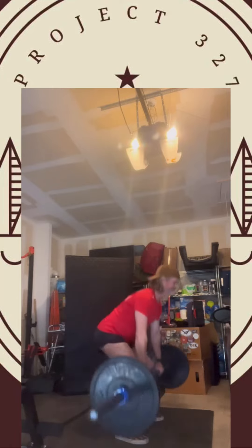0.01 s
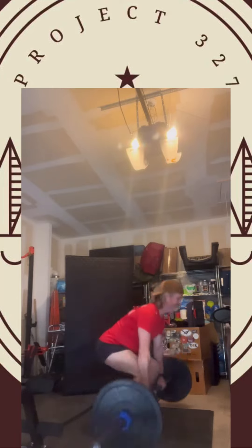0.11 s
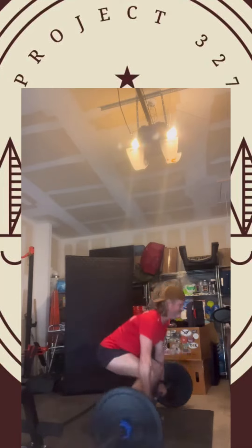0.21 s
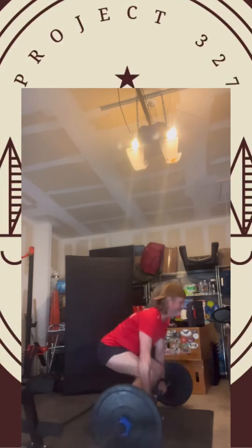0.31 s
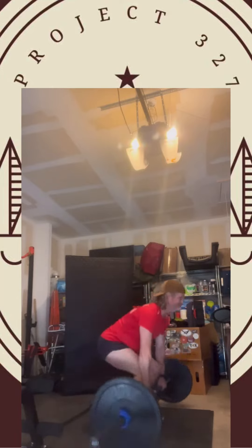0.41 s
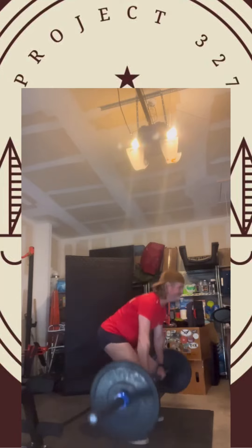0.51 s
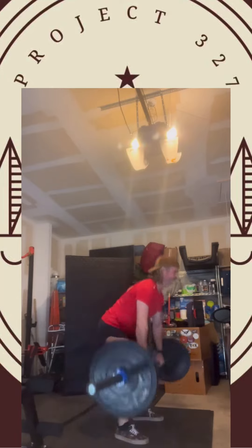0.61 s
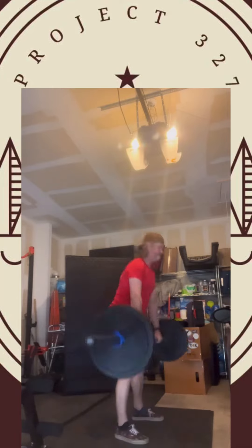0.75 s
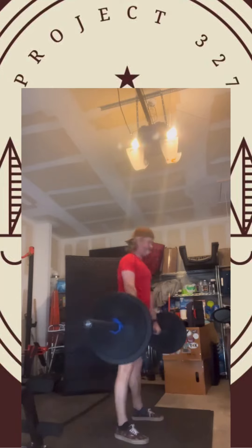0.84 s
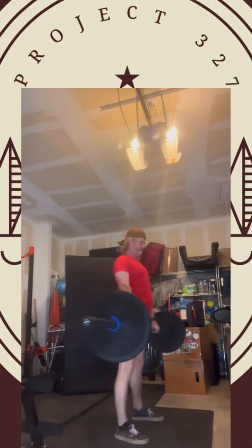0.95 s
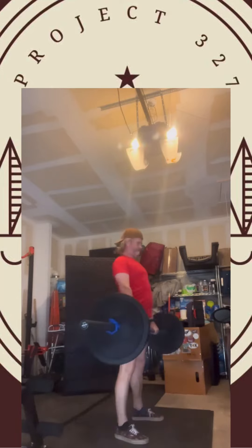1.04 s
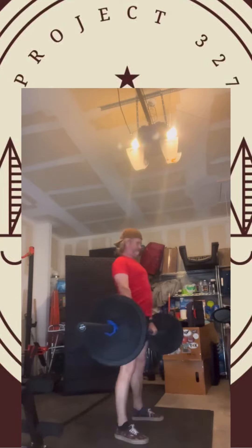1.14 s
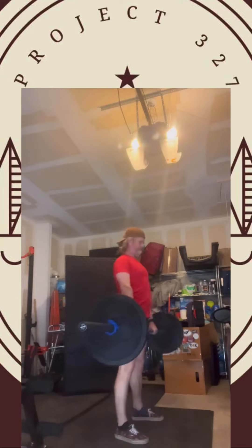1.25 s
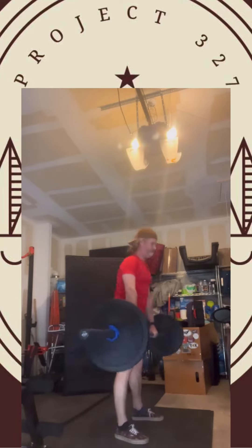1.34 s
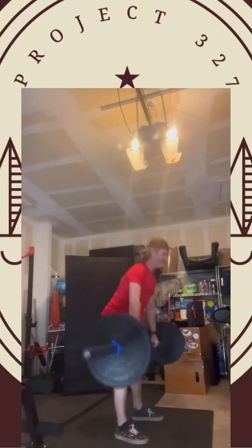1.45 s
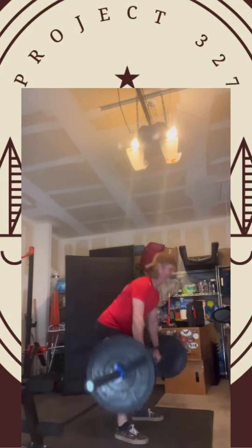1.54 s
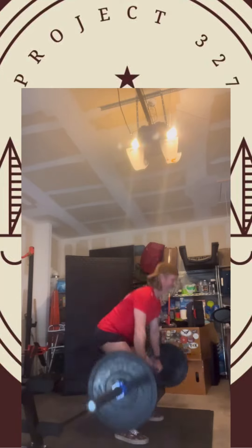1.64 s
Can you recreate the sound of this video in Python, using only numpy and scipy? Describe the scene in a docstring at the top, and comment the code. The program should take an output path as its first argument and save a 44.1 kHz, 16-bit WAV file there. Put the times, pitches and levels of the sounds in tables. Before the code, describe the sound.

A loaded barbell lands at 0.2 s: a faint touch, hard bright crack, clustered low thuds and a bounce at 0.25 s. Iron rings briefly in the garage while loose plates chatter until 0.45 s. A softer knock at 0.52 s brings light clinks until 0.72 s. Brushing hiss swells around 0.6-0.8 s and 1.45-1.6 s. Low uneven rumble and a very faint pulsing high whine continue throughout.

```python
"""A low rumble fills a garage and a faint high whine pulses: coloured and narrow-band noise, both throughout.
One end of a loaded barbell touches, the blow and a bounce follow: irregular contacts ring the iron and the room,
a noise burst gives the crack, landings thud in the floor modes and loose plates chatter.
The load settles with a softer knock and clinks as it is lifted: contacts on load and sleeve modes.
The bar brushes the legs going up and down: swelling hiss. Two close microphone ports hear it all."""
import sys
import numpy as np
from scipy import signal
from scipy.fft import rfft, irfft, next_fast_len
from scipy.io import wavfile

SR = 44100
rng = np.random.default_rng(int(sys.argv[2]) if len(sys.argv) > 2 else 0)


def inscribe(sig):
    """Save sig as 16-bit PCM at rate SR to the path in sys.argv[1].

    A 1-D sig is mono; a 2-D sig holds one channel per row.
    Samples are clipped to [-1, 1] before scaling.
    """
    pcm = np.round(np.clip(np.atleast_2d(sig).T, -1, 1) * 32767)
    wavfile.write(sys.argv[1], SR, pcm.astype(np.int16))


N = 74970


def amp(db):
    """Amplitude factor of a level in dB."""
    return 10 ** (np.asarray(db) / 20)


def rms_one(x):
    """Scale to rms 1 over all channels."""
    return x / np.sqrt(np.mean(x ** 2) + 1e-20)


def at_hz(points, hz):
    """Interpolate a table over log frequency."""
    table_hz, values = np.transpose(points)
    return np.interp(np.log(np.maximum(hz, 1)), np.log(table_hz), values)


def in_time(rows):
    """Interpolate a table over time, per sample."""
    table_s, values = np.transpose(rows)
    return np.interp(np.arange(N) / SR, table_s, values)


def lowpass(order, hz):
    """Butterworth low-pass sections."""
    return signal.butter(order, hz, fs=SR, output="sos")


def coloured(spectrum, size=N):
    """Two unrelated noises shaped to a spectrum above 20 Hz, rms 1."""
    hz = np.fft.rfftfreq(size, 1 / SR)
    white = rfft(rng.standard_normal((2, size)))
    return rms_one(irfft(white * amp(at_hz(spectrum, hz)) * (hz > 20), size))


def drift(knots_per_s):
    """Slow random level: normal knots of spread 1, joined by lines."""
    knots = rng.standard_normal(200)
    return np.interp(np.arange(N) / SR * knots_per_s, np.arange(200), knots)


# rumble spectrum: f/Hz, relative density/dB
RUMBLE_SPECTRUM = [(30, -15), (45, -6), (65, 5), (100, 0.5), (170, -9), (300, -13), (550, -8), (900, -16.5),
                   (1400, -25.5), (2000, -34), (3000, -47.5), (5000, -49.5), (9000, -57), (16000, -63.5)]
# swell of the rumble bass: t/s, relative level/dB
BASS_SWELL = [(0, 7), (.074, -3.5), (.146, 2.5), (.18, -2), (.5, -1.5), (.596, 3.5), (.65, -1), (.77, -1),
              (.866, 2.5), (.93, 3.5), (1.0, 1.5), (1.1, -0.5), (1.168, -5.5), (1.278, 2), (1.42, -2.5),
              (1.46, 2), (1.58, -2.5), (1.62, 2), (1.7, 1)]
# swell of the upper rumble: t/s, relative level/dB
UPPER_SWELL = [(0, 3), (.15, -1.5), (.5, 4), (.75, 0), (1.0, 0), (1.2, 0.5), (1.45, 0.5), (1.7, -0.5)]
RUMBLE_DB, BASS_BELOW_HZ = -48.5, 100
BASS_LUMPS_DB, UPPER_LUMPS_DB = 3, 1  # spread of the random level


def rumble():
    """Low noise whose level comes in lumps, most of all in the bass."""
    noise = coloured(RUMBLE_SPECTRUM)
    bass = signal.sosfiltfilt(lowpass(2, BASS_BELOW_HZ), noise)
    bass_db = in_time(BASS_SWELL) + BASS_LUMPS_DB * drift(25.0)
    upper_db = in_time(UPPER_SWELL) + UPPER_LUMPS_DB * drift(13.0)
    return amp(RUMBLE_DB) * (amp(bass_db) * bass + amp(upper_db) * (noise - bass))


WHINE_HZ, WHINE_HALF_WIDTH_HZ, WHINE_DB = 14200, 330, -85.5
PULSES_PER_S, PULSE_PEAK_S, PULSE_SHARPNESS = 30, 0.026, 0.72


def whine():
    """Narrow high noise band under a steady periodic pulse."""
    edges_hz = [WHINE_HZ - WHINE_HALF_WIDTH_HZ, WHINE_HZ + WHINE_HALF_WIDTH_HZ]
    band = signal.butter(2, edges_hz, "band", fs=SR, output="sos")
    hiss = signal.sosfilt(band, rng.standard_normal((2, N)))
    phase = 2 * np.pi * PULSES_PER_S * (np.arange(N) / SR - PULSE_PEAK_S)
    pulse = np.exp(PULSE_SHARPNESS * np.cos(phase))
    return amp(WHINE_DB) * rms_one(pulse * hiss)


# bar on cloth: f/Hz, relative density/dB
BRUSH_SPECTRUM = [(1500, -8), (2100, 1.3), (3000, -19), (4000, -11), (5200, -11.5), (7000, -12.5),
                  (8000, -17), (9000, -17.5), (10200, -28.5), (11500, -24.5), (13000, -18.5),
                  (14300, -13.5), (15500, -20), (16200, -44)]
# brushing: t/s, level/dB
BRUSH_LEVEL = [(0, -94), (.45, -80.5), (.6, -60.5), (.8, -59.5), (.9, -68.5), (1.02, -63.5), (1.09, -67),
               (1.13, -77), (1.2, -75.5), (1.3, -69), (1.45, -60.5), (1.6, -62), (1.7, -68.5)]
# treble of the brushing against the rest: t/s, relative level/dB
BRUSH_TREBLE = [(0, -2.5), (1.1, 5), (1.3, -2.5), (1.7, -11)]
BRUSH_TREBLE_ABOVE_HZ = 11000


def brushing():
    """Smooth friction hiss of the bar along the legs, with a moving treble share."""
    hiss = coloured(BRUSH_SPECTRUM)
    low = signal.sosfiltfilt(lowpass(4, BRUSH_TREBLE_ABOVE_HZ), hiss)
    treble = amp(in_time(BRUSH_TREBLE)) * (hiss - low)
    return amp(in_time(BRUSH_LEVEL)) * (low + treble)


# the blow as heard through room and microphone: f/Hz, relative density/dB
BLOW_COLOUR = [(35, -30.5), (60, -13.5), (120, -8), (190, -4.5), (300, -6), (500, -3), (1000, -1.36),
               (1500, -7.0), (2400, -6.5), (3400, -4.5), (4200, -5), (5200, -3.5), (6200, -6),
               (7300, -11.0), (8200, -13.0), (9600, -9.5), (10500, -20), (11200, -52.5), (12300, -25.5),
               (13400, -6), (15200, -9.5), (16200, -61)]
# decay of the garage: f/Hz, t60/s
GARAGE_T60 = [(80, 0.26), (300, .35), (800, 0.54), (1800, 0.7), (4000, 0.63), (9000, 0.53), (14000, .35)]
GARAGE_RISE_S = 0.0024


def garage(x):
    """Two diffuse room responses: coloured noise that dies band by band, convolved with x."""
    t, hz = np.arange(SR) / SR, np.fft.rfftfreq(SR, 1 / SR)
    noise = rfft(coloured(BLOW_COLOUR, SR))
    centres_hz = np.geomspace(60, 16000, num=14)
    response = 0
    for k, centre_hz in enumerate(centres_hz):
        # overlapping triangular bands in log frequency
        share = np.interp(np.log(hz + 1), np.log(centres_hz), np.arange(14) == k)
        t60_s = at_hz(GARAGE_T60, centre_hz)
        response = response + irfft(noise * share, SR) * amp(-60 * t / t60_s)
    response = response * np.clip(t / GARAGE_RISE_S, 0, 1)
    response = response * np.sqrt(SR / 20) / np.sqrt(np.sum(response ** 2) / 2)
    return signal.fftconvolve(x[None], response, axes=1)[:, :N]


CONTACTS_PER_S, CONTACT_SPREAD_DB = 900, 4
RATTLE_FADE_DB = 6.5  # after one rattle length; grows with time squared


def rattle(start_s, level_db, first_db, length_s, dull_hz):
    """A first contact, then random uneven ones that fade, low-passed at dull_hz."""
    t = np.arange(N) / SR - start_s
    fade = (t > 0) * amp(-RATTLE_FADE_DB * (t / length_s) ** 2)
    sizes = amp(CONTACT_SPREAD_DB * np.minimum(rng.exponential(1, N), 3))
    sizes = sizes * rng.choice([-1, 1], N)
    hits = sizes * (rng.random(N) < CONTACTS_PER_S / SR) * fade
    hits[int(start_s * SR)] = amp(first_db + CONTACT_SPREAD_DB)
    hits = amp(level_db) * hits / np.sqrt(np.sum(hits ** 2))
    return signal.sosfilt(lowpass(4, min(dull_hz, SR / 2.1)), hits + 1e-18)


def ringing(contacts, modes):
    """Every contact excites each mode, a two-pole resonator with its own t60."""
    out = 0
    for hz, level_db, t60_s in modes:
        radius, w = amp(-60 / (t60_s * SR)), 2 * np.pi * hz / SR
        poles = [1, -2 * radius * np.cos(w), radius * radius]
        out = out + amp(level_db) * signal.lfilter([0, np.sin(w)], poles, contacts + 1e-18)
    return out


# light clinks as the load is taken up: t/s, relative level/dB
CLINKS = [(.53, -39), (.548, -39), (.575, -45.5), (.598, -48), (0.621, -51), (0.644, -45.5), (.686, -45.5),
          (.718, -57)]
# modes of collar and sleeve: f/Hz, relative level/dB, t60/s
SLEEVE_MODES = [(1730, -8, 0.016), (1770, 1, 0.052), (1898, 3, 0.057), (2010, -11, 0.036)]
CLINK_LENGTH_S = 0.0045


def clinks():
    """Very short rattles ring collar and sleeve."""
    contacts = sum(rattle(s, level_db, 3.3, CLINK_LENGTH_S, 6000) for s, level_db in CLINKS)
    return ringing(contacts, SLEEVE_MODES)


# loose plates on the sleeve after the blow: t/s, relative level/dB
CHATTER = [(.272, -24.5), (.30, -29.5), (0.331, -29), (0.363, -32.5), (0.404, -35), (0.447, -37)]
CHATTER_LENGTH_S = 0.021


def chatter(modes):
    """Short rattles of loose plates ring the given damped modes."""
    contacts = sum(rattle(s, level_db, 3.0, CHATTER_LENGTH_S, 9800) for s, level_db in CHATTER)
    return ringing(contacts, modes)


# plates meet the floor: t/s, relative level/dB
THUDS = [(.2035, -21), (0.2141, -23), (0.2264, -21.5), (0.2381, -25.5), (.253, -23.5), (.267, -27.5),
         (0.299, -33), (.332, -33)]
# modes of the floor under the blow: f/Hz, relative level/dB, t60/s
FLOOR_MODES = [(73.7, -13, 0.28), (122.05, -2.5, .12), (190, 0, .11), (430, -10, 0.12), (591.4, 5, .09),
               (746, 1, 0.14), (898, -6, 0.18), (1073, 0.5, .08), (1173, 5, 0.072)]
THUD_DB, THUD_SPREAD_DB, THUD_BELOW_HZ = -4.5, 2, 2480


def thuds():
    """Each landing strikes every floor mode with a random strength of its own."""
    s, level_db = np.transpose(THUDS)
    spread = rng.standard_normal((len(s), len(FLOOR_MODES)))
    out = 0
    for k, mode in enumerate(FLOOR_MODES):
        hits = np.zeros(N)
        hits[(s * SR).astype(int)] = amp(level_db + THUD_SPREAD_DB * spread[:, k])
        out = out + ringing(hits, [mode])
    return amp(THUD_DB) * signal.sosfilt(lowpass(2, THUD_BELOW_HZ), out)


# touch, blow, bounce, settling: t/s, relative level/dB, first contact/dB, rattle length/s, low-pass f/Hz
CLATTERS = [(0.184, -37.5, -4, .012, 5630), (0.2017, -14.5, 12.5, 0.037, 18000),
            (0.251, -25.5, 5.5, 0.03, 3200), (0.52, -43, 9, 0.066, 2480)]
# modes of the iron: f/Hz, relative level/dB, t60/s
IRON_MODES = [(2160, -3.5, 0.5), (2465, -2.5, 0.63), (2750, -5.5, 0.84), (3042, -4, .48),
              (3330, -5.5, 0.61), (3570, -5.5, .41), (3954, -6, .55), (4347, -6, 0.42), (4420, -8, 0.35),
              (4745, -9, 0.57), (4700, -5.5, .5), (5076, -8, 0.44), (5466, -7, .55), (5530, -5, .7),
              (5570, -8.5, .55), (6070, -4.5, 0.34), (6537, -7, 0.45), (7031, -7, 0.57), (8085, 0.5, 0.47),
              (9300, 0.5, .35), (10637, 2, .4), (13400, -1.5, 0.13), (15100, -3.5, .25)]
# modes of the settling load: f/Hz, relative level/dB, t60/s
LOAD_MODES = [(243, -8, 0.027), (269.6, 2.5, 0.12), (320, 0, 0.093), (370, -3.5, 0.05), (503, -3.5, 0.04),
              (790, -8, .04), (950, -5, 0.034)]
DAMPED_SHARE = .09  # share of its t60 that iron pressed on the floor keeps
ROOM_RING_DB, ROOM_LOAD_DB, ROOM_CLINK_DB = -31.5, -28.5, -35
NEAR_RING_DB, NEAR_LOAD_DB, NEAR_CHATTER_DB, NEAR_IRON_BELOW_HZ = -16.5, 5, 0.4, 7200


def barbell():
    """Contacts ring iron, load and sleeve; the room answers and part is heard directly."""
    touch, blow, bounce, settle = (rattle(*row) for row in CLATTERS)
    contacts = touch + blow + bounce
    load = ringing(settle, LOAD_MODES)
    sleeve = clinks()
    damped = [(hz, level_db, DAMPED_SHARE * t60_s) for hz, level_db, t60_s in IRON_MODES]
    to_room = contacts + amp(ROOM_RING_DB) * ringing(contacts, damped)
    to_room = to_room + amp(ROOM_LOAD_DB) * load + amp(ROOM_CLINK_DB) * sleeve
    iron = amp(NEAR_RING_DB) * ringing(contacts, IRON_MODES) + amp(NEAR_CHATTER_DB) * chatter(damped)
    iron = signal.sosfilt(lowpass(8, NEAR_IRON_BELOW_HZ), iron)
    near = thuds() + iron + amp(NEAR_LOAD_DB) * load + sleeve
    return garage(to_room) + near * [[1], [0]]  # direct sound in the first field only


CRACK_DB, CRACK_DECAY_S, CRACK_ABOVE_HZ = -21, 0.0024, 2100


def crack():
    """Short bright front of the blow: decaying noise, high-passed, unrelated left and right."""
    t = np.arange(N) / SR - CLATTERS[1][0]
    burst = rng.standard_normal((2, N)) * (t > 0) * np.exp(-np.abs(t) / CRACK_DECAY_S)
    highpass = signal.butter(2, CRACK_ABOVE_HZ, "high", fs=SR, output="sos")
    return amp(CRACK_DB) * signal.sosfilt(highpass, burst)


# phase by which left leads: f/Hz, phase/rad
PORT_LEAD = [(60, 0.5), (170, -0.1), (330, 0.5), (520, 3), (950, 3.5), (2400, 3.5), (2900, 3.5),
             (3350, 3.5), (4100, 4.5), (4500, 2.5), (5400, 1.2), (6200, 1.13), (7000, 1.5), (7900, 3),
             (10700, 2.5), (12600, 5.5), (14000, 6), (16400, 6)]
# likeness of the ports: f/Hz, share/0-1
PORT_LIKENESS = [(60, .998), (170, 0.96), (520, 0.67), (1500, .72), (2400, 0.92), (2900, 0.97),
                 (3250, 0.87), (3600, 0.7), (4200, 0.31), (5500, 0.79), (6500, 0.39), (7600, 0.95),
                 (8200, 0.92), (10800, 0.95), (11600, 1), (12700, 1), (16000, 1)]
# left over right: f/Hz, level/dB
PORT_TILT = [(60, 0.5), (110, 0.5), (200, 4.5), (380, 10.5), (700, 4), (1290, 3), (2380, 1), (2900, 0.5),
             (4400, 1), (8120, 0.5), (15000, -0.5)]
OPPOSED_HZ, OPPOSED_EDGE_HZ = (7600, 11500), 700  # band of opposed ports, width of its soft edges


def ports(pair):
    """Left hears the first field; right hears it phase-shifted, rescaled and mixed with the second."""
    size = next_fast_len(N + 4096)
    hz = np.fft.rfftfreq(size, 1 / SR)
    first, second = rfft(pair, size)
    alike = np.clip(at_hz(PORT_LIKENESS, hz), 0, 1)
    shifted = first * np.exp(-1j * at_hz(PORT_LEAD, hz))
    right = alike * shifted + np.sqrt(1 - alike ** 2) * second
    right = right * amp(-at_hz(PORT_TILT, hz))
    inside_hz = np.minimum(hz - OPPOSED_HZ[0], OPPOSED_HZ[1] - hz)
    opposed = np.sin(np.pi / 2 * np.clip(inside_hz / OPPOSED_EDGE_HZ, 0, 1)) ** 2
    right = (1 - opposed) * right - opposed * first
    return np.array([pair[0], irfft(right, size)[:N]])


def scene():
    """All sources through the two ports; the crack is added to each port directly."""
    return ports(rumble() + whine() + brushing() + barbell()) + crack()


BASS_CUT_HZ, TOP_CUT_HZ = 51, 16600


def record(dry):
    """Cut the deepest bass and the top; 60 dB down from TOP_CUT_HZ up."""
    dry = signal.sosfilt(signal.butter(2, BASS_CUT_HZ, "high", fs=SR, output="sos"), dry)
    return signal.sosfilt(signal.cheby2(12, 60, TOP_CUT_HZ, fs=SR, output="sos"), dry)


dry = scene()
out = record(dry)
inscribe(out)
```